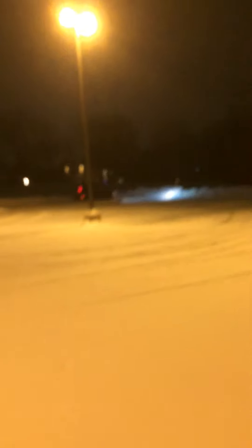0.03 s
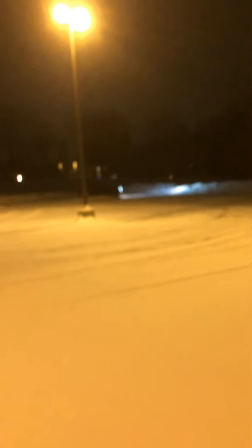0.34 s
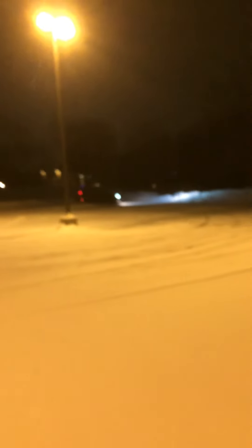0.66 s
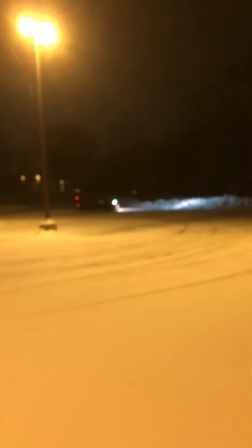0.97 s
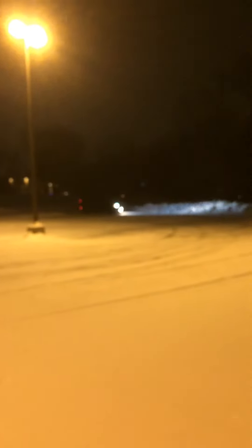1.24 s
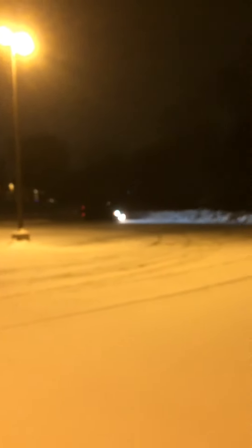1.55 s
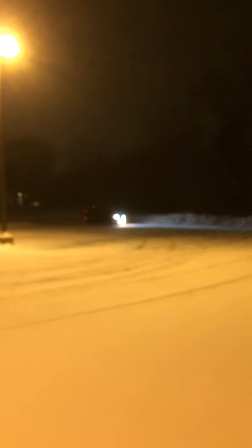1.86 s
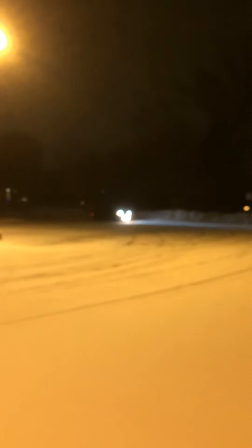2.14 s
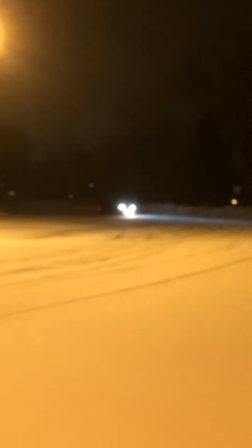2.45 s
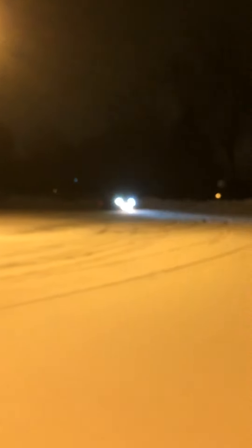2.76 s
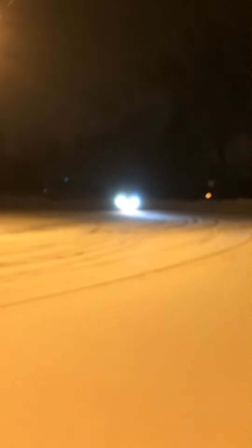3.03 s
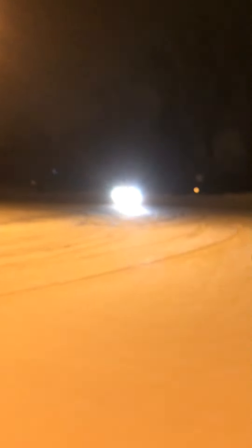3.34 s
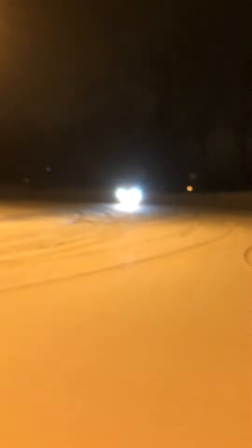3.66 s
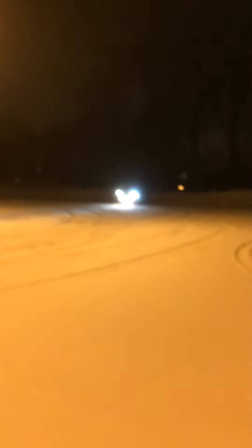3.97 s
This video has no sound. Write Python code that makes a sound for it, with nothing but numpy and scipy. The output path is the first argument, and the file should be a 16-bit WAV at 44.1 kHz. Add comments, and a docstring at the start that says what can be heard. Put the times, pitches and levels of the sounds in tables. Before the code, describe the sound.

A burbling car engine revs repeatedly while sliding nearer on snow, with light wind.

```python
"""A snowy lot at night: light wind rumbles on the microphone over the wash of a far town.
From 0.3 s a burbling four-cylinder car slides closer, its exhaust booming at each throttle blip
while the spinning tyres spray snow. A few wind buffets hit, most between 2 and 2.6 s.
From 2 s the surges are louder: the tailpipe rasps at their tops and gas rushes at full throttle.
Near 2.4 s the engine throbs once under load."""
import sys
import numpy as np
from scipy import signal
from scipy.fft import rfft, irfft
from scipy.io import wavfile
from scipy.ndimage import uniform_filter1d

SR = 44100
rng = np.random.default_rng(int(sys.argv[2]) if len(sys.argv) > 2 else 0)


def persist_wave(psi):
    """Save psi, clipped to +-1, as 16-bit WAV."""
    counts = np.round(np.clip(psi, -1, 1) * 32767).astype(np.int16)
    wavfile.write(sys.argv[1], SR, np.atleast_2d(counts).T)


N = 176400
T = np.arange(N) / SR
BIN_HZ = np.fft.rfftfreq(N, 1 / SR)

# Turbulence spectrum, wind and exhaust. Each row: frequency in Hz, relative level in dB.
TURBULENCE_SPECTRUM = [(20,-30),(55,1.5),(150,2),(900,-62)]


def amp(db):
    """dB to gain."""
    return 10 ** (np.asarray(db) / 20)


def unit(x):
    """Scale to rms 1."""
    return x / np.sqrt(np.mean(x ** 2) + 1e-20)


def curve(table, column=1):
    """One column of a time table at every sample."""
    table = np.array(table)
    return np.interp(T, table[:, 0], table[:, column])


def gain_at(spectrum, hz):
    """Gain of a spectrum, interpolated over log frequency."""
    knots_hz, db = np.transpose(spectrum)
    return amp(np.interp(np.log(hz + 1), np.log(knots_hz), db))


def colour(x, spectrum):
    """Filter by a spectrum, cut below 12 Hz; rms 1."""
    return unit(irfft(rfft(x) * gain_at(spectrum, BIN_HZ) * (BIN_HZ > 12), N))


def wander(edge_hz):
    """Low-passed noise; rms 1."""
    return unit(irfft(rfft(rng.standard_normal(N)) / np.sqrt(1 + (BIN_HZ / edge_hz) ** 6), N))


def drift(per_s):
    """Random values joined by straight lines."""
    return np.interp(T * per_s, np.arange(500), rng.standard_normal(500))


def patchy(spectrum, patch_db):
    """Coloured noise whose level varies in small time-frequency patches; rms 1."""
    cells = signal.stft(rng.standard_normal(N), nperseg=512)[2]
    patches = uniform_filter1d(rng.standard_normal(cells.shape), size=7, axis=0)
    patches = unit(uniform_filter1d(patches, size=9, axis=1))
    noise = signal.istft(cells * amp(patch_db * patches), nperseg=512)[1][:N]
    return colour(noise, spectrum)


def wind():
    """Lumpy, slowly rising rumble and short buffets on the microphone."""
    # Each row: centre in seconds, length in seconds, level in dB, upper edge in Hz.
    buffets = [(0.789,0.031,-23,108),(2.063,0.022,-22,223.2),(2.181,0.017,-13.5,460),(2.2,0.0062,-20,780),(2.231,0.026,-21.5,307),(2.585,0.021,-25.5,275),(3.99,0.035,-32,89.9)]
    start_db, rise_db_per_s, swell_db = -47.5, 0.5, 2
    level_db = start_db + rise_db_per_s * T + swell_db * wander(12)
    out = amp(level_db) * colour(rng.standard_normal(N), TURBULENCE_SPECTRUM)
    highpass = signal.butter(2, 50, "high", fs=SR, output="sos")
    for centre_s, length_s, db, edge_hz in buffets:
        window = np.exp(-(2 * (T - centre_s) / length_s) ** 2)
        puff = signal.sosfilt(highpass, wander(edge_hz) * window)
        out += amp(db) * puff * np.linalg.norm(window) / np.linalg.norm(puff)
    return out


def far_town():
    """Faint, dull wash of a distant town."""
    # Each row: frequency in Hz, relative level in dB.
    wash_spectrum = [(110,-3),(400,-14),(1400,-12.5),(2400,-25.5),(15000,-76)]
    return amp(-55) * patchy(wash_spectrum, patch_db=3)


def snow_spray():
    """Spinning tyres throw up powder: patchy hiss and fine fizz."""
    # Each row: time in seconds, hiss level in dB, fizz level in dB.
    spray_db = [(.24,-73,-74),(.37,-64,-66),(.67,-54.5,-60.5),(1.04,-57.5,-63.5),(1.22,-59.5,-61.5),(1.34,-53,-56.5),(1.58,-61,-72),(1.72,-60.5,-62),(1.745,-58.5,-54.5),(1.92,-46,-52.5),(2.2,-52,-54),(2.53,-43.5,-58.5),(2.74,-49.5,-50),(2.95,-42,-47),(3.36,-49.5,-47.5),(3.67,-42.5,-51),(3.8,-48.5,-52.5)]
    # Each row of both: frequency in Hz, relative level in dB.
    hiss_spectrum = [(300,8.5),(1500,1),(4700,3),(9800,-2.5),(11200,-29),(15000,-21)]
    fizz_spectrum = [(5500,0.5),(15000,2)]
    hiss = amp(curve(spray_db)) * patchy(hiss_spectrum, patch_db=2)
    fizz = amp(curve(spray_db, column=2)) * patchy(fizz_spectrum, patch_db=2)
    return hiss + fizz


def crank():
    """Slightly unsteady engine cycle rate and running cycle count; four firings per cycle."""
    # Each row: time in seconds, cycle rate in Hz.
    speed = [(.3,19.6),(.55,28.1),(1.02,40.4),(1.22,29.2),(1.45,32.9),(1.74,24.6),(2.09,41.5),(2.33,50.3),(2.52,54.2),(2.69,43.4),(2.84,37.8),(3,43.3),(3.23,53.5),(3.42,42.9),(3.74,57.5),(3.89,46.7),(4,39.5)]
    cycle_hz = uniform_filter1d(curve(speed), size=900) * (1 + .008 * wander(30))
    return cycle_hz, np.cumsum(cycle_hz) / SR


def exhaust(cycle_hz, cycles):
    """Boom at the firing rate, burble from unequal firings, chuff from pipe turbulence."""
    # Each row of both: time in seconds, level in dB.
    boom_db = [(.28,-72),(.335,-27),(.55,-26.5),(.575,-46),(.66,-32),(.745,-36),(.785,-27),(.98,-22),(1.015,-39),(1.075,-31.5),(1.1,-69),(1.41,-41.5),(1.74,-55),(1.86,-29),(1.98,-33),(2.04,-18.5),(2.17,-17.5),(2.29,-30.5),(2.34,-21.5),(2.48,-17.5),(2.515,-33),(2.66,-42),(2.8,-34),(2.97,-22),(3.21,-20),(3.3,-42.5),(3.4,-33),(3.47,-22),(3.62,-19.5),(3.74,-30.5),(4,-43)]
    burble_db = [(.28,-54.5),(.37,-29),(.56,-52),(.8,-32),(.96,-26),(1.03,-54),(1.75,-61.5),(2.08,-25.5),(2.47,-35),(2.56,-46),(2.85,-48.5),(2.99,-24),(3.19,-16.5),(3.28,-52),(3.4,-51.5),(3.5,-19),(3.69,-18),(3.77,-45)]
    # Each entry: multiple of the cycle rate, relative level in dB.
    burble_orders = {3: -8, 5: 0, 6: -7, 7: -1.77, 8: -2.8, 10: -5}
    # Each row: frequency in Hz, gain in dB.
    silencer = [(110,-10),(170,-1.5),(280,0.5),(315,-13.5),(400,-18),(480,-69)]
    boom, burble = amp(curve(boom_db)), amp(curve(burble_db))
    flutter = 1 + .14 * drift(45)
    tones = boom * flutter * np.cos(2 * np.pi * 4 * cycles)
    speed_fade = np.minimum(1, (36 / cycle_hz) ** 3.53)  # falls above 36 cycles/s
    for order, db in burble_orders.items():
        strength = flutter if order in (5, 8) else speed_fade * (1 + .35 * drift(25))
        gain = amp(db) * burble * strength * gain_at(silencer, order * cycle_hz)
        tones += gain * np.cos(2 * np.pi * (order * cycles + rng.random()))
    chuff = amp(-12) * boom * speed_fade * colour(rng.standard_normal(N), TURBULENCE_SPECTRUM)
    return np.sqrt(2) * tones + chuff


def tailpipe_rasp(cycles):
    """High engine orders sweep through fixed tailpipe resonances, with a gas puff per firing."""
    # Each row: time in seconds, level in dB.
    rasp_db = [(.4,-65),(.86,-49.5),(.96,-47.5),(1.04,-56.5),(1.8,-64),(2.05,-44),(2.28,-43.5),(2.33,-37),(2.47,-35.5),(2.53,-47.5),(2.72,-59),(3.09,-39.5),(3.15,-31.5),(3.21,-33.5),(3.26,-47.5),(3.44,-53.5),(3.5,-34),(3.7,-34),(3.75,-46)]
    # Each row: resonance in Hz, peak gain in dB.
    pipe_modes = [(535,2.5),(685,4),(945,8.5),(1205,8),(1500,3),(1700,-0.5)]
    # Each row: frequency in Hz, relative gain in dB.
    rasp_spectrum = [(250,1),(600,-2),(1800,4.5),(2200,-2),(10000,-22)]
    strong_orders, boost_db, scatter_db = (14, 17), 8, 5
    rolloff_order, mode_width_hz = 45, 51
    tones = np.zeros(N)
    for order in range(8, 70):
        order_db = boost_db * (order in strong_orders) + scatter_db * drift(25)
        gain = amp(order_db) / (1 + (order / rolloff_order) ** 4)
        tones += gain * np.cos(2 * np.pi * (order * cycles + rng.random()))
    puffs = rng.standard_normal(N) * (1 + np.cos(2 * np.pi * 4 * cycles) / 2)
    pipe = 1 + sum(amp(db) / (1 + (2 * (BIN_HZ - hz) / mode_width_hz) ** 2) for hz, db in pipe_modes)
    gas = irfft(rfft(unit(tones) + 1.575 * puffs) * pipe, N)
    return amp(curve(rasp_db)) * colour(gas, rasp_spectrum)


def gas_rush():
    """Gas rushes at full throttle; a higher whoosh grows toward the end of each rush."""
    # Each row: start in seconds, end in seconds, level in dB, centre in Hz.
    rushes = [(2.297,2.494,-37.5,2505),(3.13,3.23,-37.5,2830),(3.491,3.715,-35,1500)]
    # Each row: multiple of the centre frequency, relative level in dB.
    rush_shape = [(.5,-14),(1.1,-3),(1.45,-8),(3.6,-25.5)]
    # Each row: frequency in Hz, relative level in dB.
    whoosh_spectrum = [(5000,-8),(7800,0.5),(11000,-25)]
    ramp_s = 0.057
    whoosh = amp(-40) * patchy(whoosh_spectrum, patch_db=3)
    out = np.zeros(N)
    for start_s, end_s, level_db, centre_hz in rushes:
        spectrum = [(ratio * centre_hz, db) for ratio, db in rush_shape]
        rush = amp(level_db) * patchy(spectrum, patch_db=3)
        gate = np.clip(np.minimum(T - start_s, end_s - T) / ramp_s + .5, 0, 1)
        progress = np.clip((T - start_s) / (end_s - start_s), 0, 1)
        out += gate * (rush + whoosh * progress)
    return out


def load_throb(cycles):
    """Under heavy load the firings fall uneven and the third order swells once."""
    centre_s, length_s, level_db = 2.422, .2, -28
    window = np.exp(-(2 * (T - centre_s) / length_s) ** 2)
    return amp(level_db) * window * unit(np.cos(2 * np.pi * (3 * cycles + rng.random())))


def scene():
    """Mono mix of car, wind and town."""
    cycle_hz, cycles = crank()
    engine = exhaust(cycle_hz, cycles) + load_throb(cycles) + tailpipe_rasp(cycles) + gas_rush()
    return (engine + snow_spray() + wind() + far_town())[None]


def record(dry):
    """Steep low-pass band limit."""
    edge_hz = 15200
    lowpass = signal.firwin(511, edge_hz, window=("kaiser", 9), fs=SR)
    return signal.oaconvolve(dry, lowpass[None], "same")


dry = scene()
out = record(dry)
persist_wave(out)
```